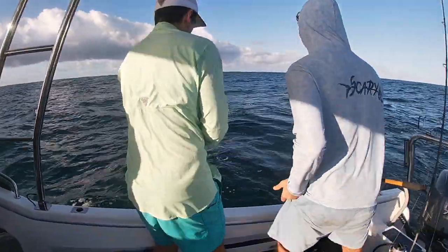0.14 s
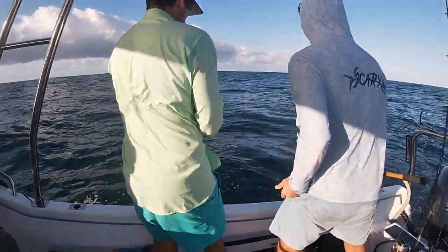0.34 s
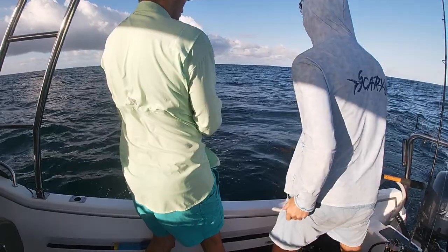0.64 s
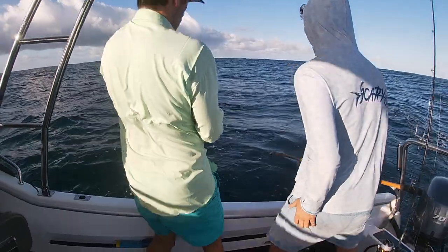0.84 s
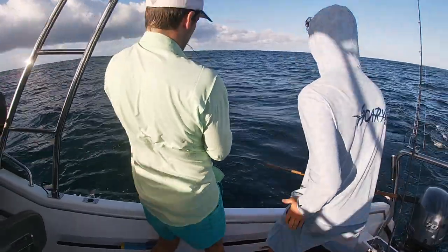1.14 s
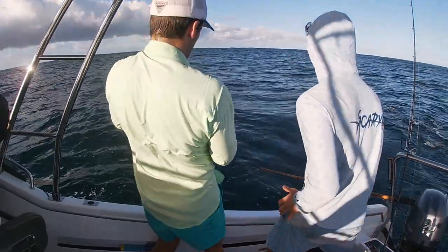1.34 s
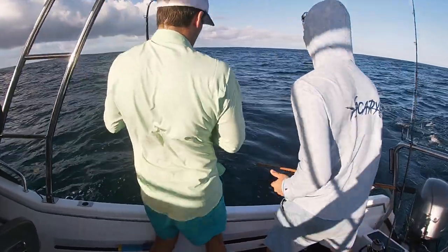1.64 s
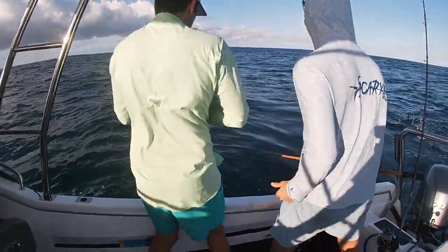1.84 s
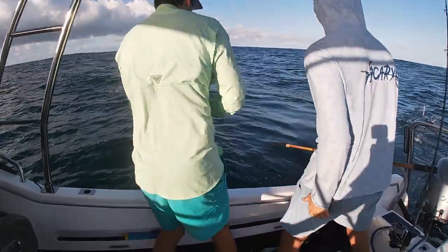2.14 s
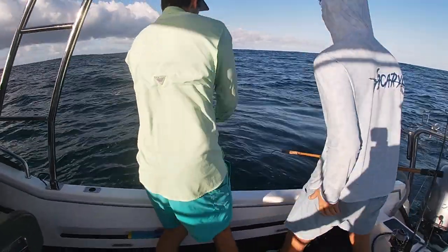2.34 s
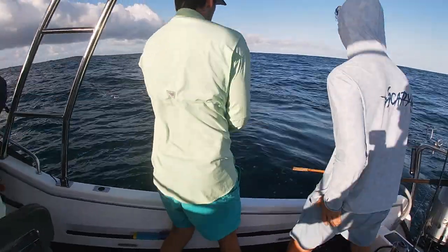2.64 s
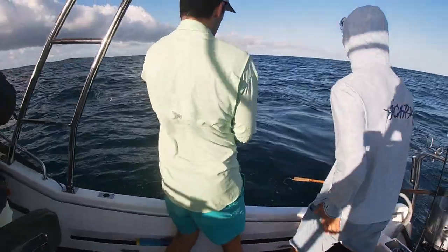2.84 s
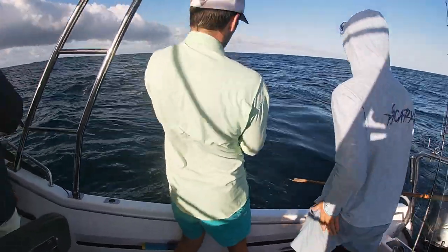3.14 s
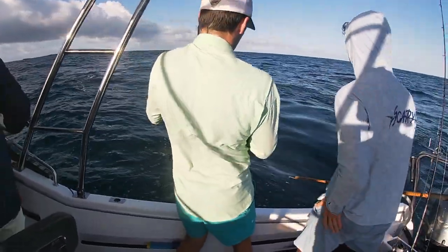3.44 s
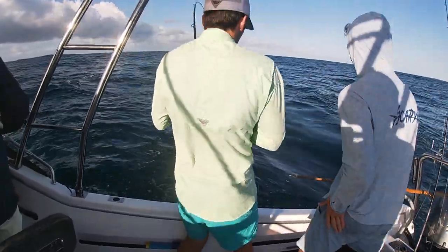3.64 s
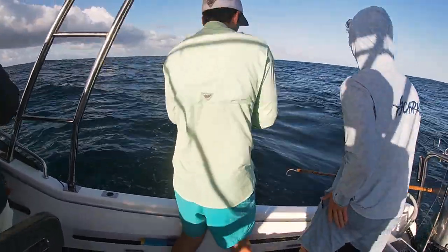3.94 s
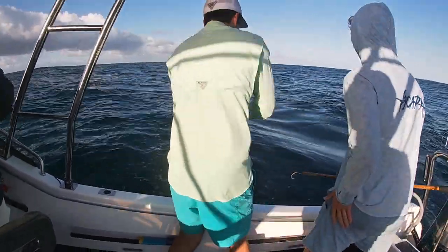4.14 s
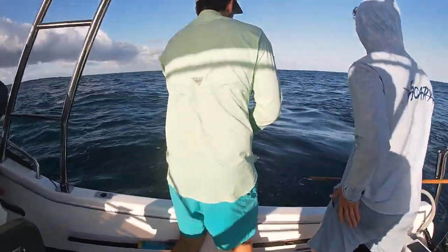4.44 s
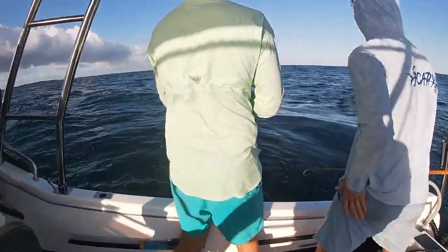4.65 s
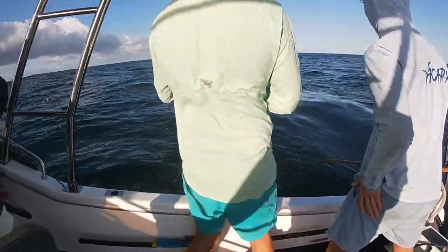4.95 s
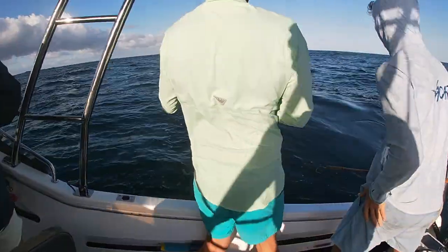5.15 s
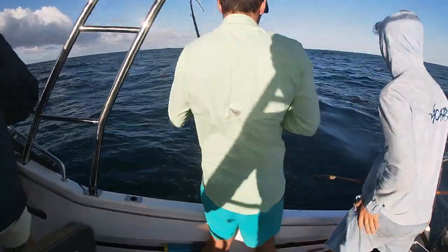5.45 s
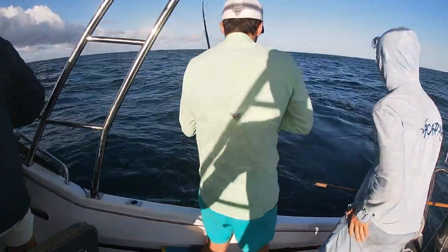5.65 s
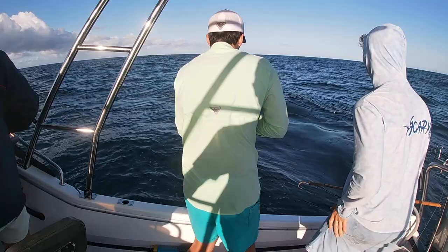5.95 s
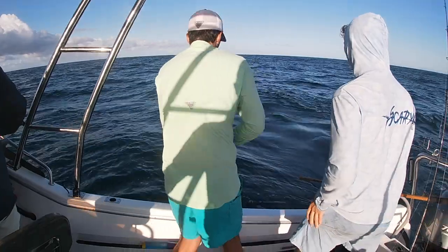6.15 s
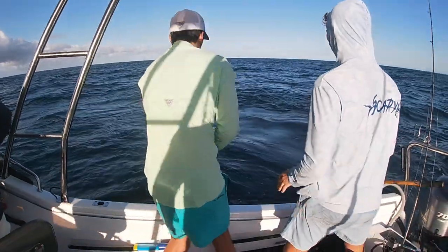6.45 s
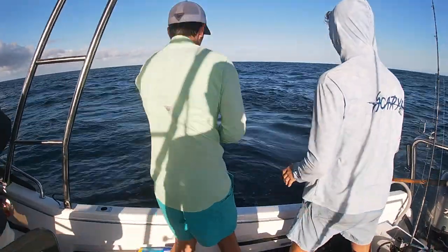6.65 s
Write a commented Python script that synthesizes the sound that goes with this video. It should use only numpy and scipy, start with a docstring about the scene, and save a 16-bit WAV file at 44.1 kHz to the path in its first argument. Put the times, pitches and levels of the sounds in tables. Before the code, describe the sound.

A microphone exposed to wind aboard a trolling boat catches deep irregular buffets and soft flutter. Behind them an idling outboard putters steadily with light valve clatter, growing throatier as the stern sinks. Foam hisses and water slaps the hull. Dry bright knocks sound on deck early on, then waves swell, the exhaust churns bubbly water, and the close brings more gusts and quick gurgling plops.

```python
"""Gusts of wind thump and flutter at a microphone on a small fishing boat trolling at sea.
The outboard idles with a slow chug: tones, puffs of exhaust noise and valve clatter all follow its firings,
and the exhaust grows louder as the stern dips in the swell.
Filtered noise and short damped rings make water wash, spray, slap and gurgle along the hull.
Gear clacks on deck three times, as short bursts of bright noise."""
import sys
import numpy as np
from scipy import signal
from scipy.fft import rfft, irfft
from scipy.io import wavfile
from scipy.ndimage import uniform_filter1d

SR = 44100
rng = np.random.default_rng(int(sys.argv[2]) if len(sys.argv) > 2 else 0)


def pcm_store(signal):
    """Save signal as 16-bit PCM."""
    levels = np.round(np.clip(np.atleast_2d(signal), -1, 1) * 32767)
    wavfile.write(sys.argv[1], SR, levels.astype(np.int16).T)


N = 299870
TIME = np.arange(N) / SR

# idle speed of the engine before its small random hunting: time_s, firings_per_s
IDLE_SPEED = [(0, 25.1), (1.2, 25.0), (2.2, 24.8), (2.8, 24.55), (3.4, 24.88), (4.2, 24.97), (6.0, 25.0),
              (6.8, 24.85)]


def gain_of(db):
    """Turns decibels into amplitude."""
    return 10 ** (np.asarray(db) / 20)


def evened(x):
    """Scales a sound to an rms of 1."""
    return x / np.sqrt(np.mean(x ** 2) + 1e-20)


def curve(rows):
    """Joins the (time, value) rows of a table by straight lines."""
    time_s, values = np.transpose(rows)
    return np.interp(TIME, time_s, values)


def coloured(x, colour):
    """Filters by a curve drawn over log frequency, nearly silent above its last point; rms 1."""
    hz, db = np.transpose(colour)
    bins = np.fft.rfftfreq(len(x), 1 / SR)
    curve_db = np.interp(np.log(bins + 1), np.log(hz), db, right=-120)
    return evened(irfft(rfft(x) * gain_of(curve_db), len(x)))


def resonant(x, hz, width_hz):
    """Rings at one pitch: three equal resonances in a row give steep skirts; rms 1."""
    bins = np.fft.rfftfreq(len(x), 1 / SR)
    response = 1 / (1 + 1j * (bins - hz) / width_hz) ** 3
    return evened(irfft(rfft(x) * response, len(x)))


def wander(per_s):
    """Smooth random movement of rms 1, mostly slower than per_s times a second."""
    bins = np.fft.rfftfreq(N, 1 / SR)
    smooth = rfft(rng.standard_normal(N)) / (1 + (bins / per_s) ** 4)
    return evened(irfft(smooth, N))


def add(mix, start_s, sound):
    """Mixes a sound in at a given time."""
    part = mix[max(round(start_s * SR), 0):][:len(sound)]
    part += sound[:len(part)]


def burst(rise_s, decay_s):
    """A half-second envelope that rises quickly to 1 and dies away."""
    t = TIME[:SR // 2]
    shape = (1 - np.exp(-t / rise_s)) * np.exp(-t / decay_s)
    return shape / shape.max()


def swell(start, length, attack_s, release_s):
    """An envelope that rises smoothly to 1, holds until its length is up, and dies away."""
    age = TIME - start
    rise = np.sin(np.pi / 2 * np.clip(age / attack_s, 0, 1)) ** 2
    return rise * np.exp(-np.maximum(age - length, 0) / release_s)


def swells(rows, attack_s, release_s):
    """Sums the envelopes of rows that give start_s, length_s, level_db."""
    return sum(gain_of(db) * swell(start, length, attack_s, release_s) for start, length, db in rows)


def bubbles(per_s, low_hz, high_hz, cycles, spread_db, count=36):
    """Many short damped rings of random pitch and size."""
    happens = rng.random(N) < per_s / SR
    size = gain_of(spread_db * np.minimum(rng.exponential(1, N), 4)) * happens
    kind, t, out = rng.integers(0, count, N), TIME[:2048], np.zeros(N)
    for k, hz in enumerate(np.geomspace(low_hz, high_hz, count)):
        ring = np.sin(2 * np.pi * hz * t) * np.exp(-hz * t / cycles)
        out += signal.oaconvolve(size * (kind == k), evened(ring))[:N]
    return evened(out)


def rippled(x, patchy_db, size=1024):
    """Reflections off the moving water lift and sink narrow patches of the spectrum."""
    overlap = size * 3 // 4
    spectrum = signal.stft(x, nperseg=size, noverlap=overlap)[2]
    patches = uniform_filter1d(rng.standard_normal(spectrum.shape), size=3, axis=0)  # across pitch
    patches = evened(uniform_filter1d(patches, size=22, axis=1))  # across time
    return signal.istft(spectrum * gain_of(patchy_db * patches), nperseg=size, noverlap=overlap)[1][:N]


def firings(drift=.001):
    """Counts the engine firings so far, a fraction included; the idle hunts a little."""
    return np.cumsum(curve(IDLE_SPEED) * (1 + drift * wander(5))) / SR


def uneven(turns, spread_db):
    """Gives each firing its own random strength, with the steps between firings smoothed."""
    firing = (turns + 2).astype(int)
    strength = rng.standard_normal(firing[-1] + 1)[firing]
    return gain_of(spread_db * uniform_filter1d(strength, size=100))


def chug(turns, delay, second, decay, between):
    """Each firing gives a puff, and a weaker one follows half a cycle later; times are in cycles."""
    first_turns, second_turns = turns - delay, turns - delay - .5
    first_age, second_age = first_turns % 1 / decay, second_turns % 1 / decay
    first_puff = first_age * np.exp(1 - first_age) * uneven(first_turns, spread_db=2)
    second_puff = second * second_age * np.exp(1 - second_age) * uneven(second_turns, spread_db=3.5)
    return evened(between + first_puff + second_puff)


def engine_noise(turns, alike, count=16):
    """Noise of which a share comes back alike on every firing, slowly renewed as the water shifts."""
    cycles = rng.standard_normal((count + 1, round(SR / IDLE_SPEED[0][1])))
    which, blend = np.divmod(np.arange(N) * count, N)
    place = (turns % 1 * cycles.shape[1]).astype(int)
    angle = np.pi / 2 * blend / N  # crossfades from one stored cycle to the next
    repeated = np.cos(angle) * cycles[which, place] + np.sin(angle) * cycles[which + 1, place]
    alike = np.clip(alike, 0, 1)
    return np.sqrt(alike) * repeated + np.sqrt(1 - alike) * rng.standard_normal(N)


def outboard_and_high_rings(turns, drone_db=-1, splutter_db=-4, clatter_db=-6, high_ring_db=-15, waver=0.43):
    """Firing tones throb and drone; pulsed noise makes exhaust, clatter and splashy rings near 3 kHz."""
    # tones of the drone: multiple_of_firing_rate, relative_level_db
    drone_tones = [(2, -4.5), (3, -14.5), (4, -10.5), (5, -3), (6, -5.5), (7, -2), (8, -0.5), (9, -9.5),
                   (10, -10), (11, -13)]
    # drone through the hull, before drone_db: time_s, level_db
    hum_levels = [(0, -40.5), (0.5, -38.5), (1.2, -29.5), (1.8, -31.5), (2.45, -37), (3.5, -39),
                  (3.9, -34.5), (4.2, -24), (4.6, -29.5), (5.3, -23.5), (5.9, -32), (6.8, -27)]
    # swells of the throb: start_s, length_s, level_db
    throb_swells = [(4.0, 0.99, -34), (5.33, 0.22, -20)]
    # exhaust, louder as the stern dips, before splutter_db: time_s, level_db
    exhaust_levels = [(0, -68), (.42, -47), (.66, -36), (1.45, -38), (2.16, -35), (2.3, -44.5),
                      (2.55, -41.5), (2.8, -35.5), (3.15, -39), (3.4, -30.5), (4.2, -28.5), (5.08, -26.5),
                      (5.55, -34.5), (6.5, -31.5), (6.8, -32.5)]
    # tone of the exhaust: pitch_hz, relative_level_db
    splutter_colour = [(120, -12.5), (250, -1.5), (370, -4), (440, 0), (590, 1.5), (740, -5.5),
                       (1000, -10.5), (1600, -14.5), (3000, -41.5), (7000, -43.5)]
    # valve clatter, before clatter_db or high_ring_db: time_s, level_db
    valve_levels = [(0.0, -37.5), (1.04, -35), (2.1, -37), (2.6, -47.5), (3.48, -40), (5.0, -37),
                    (5.7, -41), (6.2, -44.5), (6.79, -41.5)]
    # tone of the valve clatter: pitch_hz, relative_level_db
    clatter_colour = [(500, -36), (1100, 2), (1850, 4), (2300, 4.5), (2750, -1), (3450, -14), (4700, -9),
                      (5600, -11), (7100, -39.5), (10000, -40), (15000, -66.5)]
    # short splashy rings near 3 kHz: start_s, length_s, level_db
    high_ring_flares = [(.83, 0.041, -41), (1.23, 0.11, -43), (2.55, 0.03, -45), (2.845, 0.09, -44),
                        (3.8, 0.14, -44.5), (5.95, 0.85, -47.5)]

    hum_db, valves_db = curve(hum_levels), curve(valve_levels)
    # the throb gains 0.31 dB for each dB of drone
    throb_gain = gain_of(-22 + 0.31 * hum_db) + swells(throb_swells, attack_s=0.11, release_s=0.018)
    throb = throb_gain * evened(np.cos(2 * np.pi * (turns - .8)))
    tones = np.zeros(N)
    for multiple, db in drone_tones:
        strength = gain_of(db) * (1 + waver * wander(12.5))
        phase = 2 * np.pi * (multiple * turns + rng.random()) + 2 * waver * wander(8.7)
        tones += strength * np.cos(phase)
    drone = gain_of(hum_db + drone_db) * evened(tones)

    puffs = engine_noise(turns, alike=0.61) * chug(turns, delay=0.258, second=0.27, decay=0.042, between=1.0)
    exhaust = gain_of(curve(exhaust_levels) + splutter_db) * coloured(puffs, splutter_colour)
    ticks = engine_noise(turns, alike=0.38) * chug(turns, delay=0.83, second=0.088, decay=0.033, between=0.97)
    clatter = gain_of(valves_db + clatter_db) * coloured(ticks, clatter_colour)
    # a faint ring follows the clatter level between the flares
    ring_gain = gain_of(valves_db + high_ring_db) + swells(high_ring_flares, attack_s=0.015, release_s=0.021)
    high_ring = ring_gain * gain_of(2 * wander(20)) * resonant(ticks, hz=3030, width_hz=520)
    return throb + drone + rippled(exhaust + clatter + high_ring, patchy_db=3.5)


def hollows(turns):
    """Each puff of exhaust rings the air trapped under the stern for as long as a hollow lasts."""
    # hollows of air under the stern: start_s, end_s, level_db, pitch_hz, width_hz
    air_hollows = [(0.98, 1.45, -39, 917, 42), (2.66, 4, -45, 1040, 140), (3.55, 4.26, -39.5, 400, 29),
                   (4.12, 5.213, -36.5, 494, 19.5), (3.998, 5.16, -40, 597, 41)]
    out = np.zeros(N)
    for start, end, db, hz, width_hz in air_hollows:
        puffs = rng.standard_normal(N) * chug(turns, delay=0.88, second=0.1, decay=0.084, between=0.1)
        ring = resonant(puffs, hz, width_hz)[round(start * SR):round(end * SR)]
        add(out, start, gain_of(db) * evened(ring) * signal.windows.tukey(len(ring), .5))
    return out


def sea_levels(calm_wash_db=-48.5, calm_spray_db=-54, spray_lag_s=0.02):
    """Each wave builds and drains away over the calm sea; its spray comes a little later."""
    # waves running along the hull: start_s, rise_s, decay_s, wash_level_db, spray_level_db
    waves = [(.2, 0.12, 1, -49, -51.5), (.55, 0.31, 0.11, -35.5, -53), (.8, 0.35, 0.36, -36, -51),
             (1.48, 0.094, 1, -39.5, -49), (2.8, 0.4, 0.43, -39, -77), (3.2, 0.22, 0.22, -31.5, -49),
             (3.4, 0.23, 0.094, -34.5, -47), (3.8, 0.22, 0.17, -32.5, -47), (4.27, 0.18, 0.15, -32, -46),
             (5.0, .2, 0.11, -41, -44.5), (5.9, 0.2, 0.53, -44.5, -50.5)]
    wash_power, spray_power = gain_of(calm_wash_db) ** 2, gain_of(calm_spray_db) ** 2
    for start, rise_s, decay_s, wash_db, spray_db in waves:
        wash_wave = gain_of(wash_db) * swell(start, rise_s, rise_s, decay_s)
        spray_wave = gain_of(spray_db) * swell(start + spray_lag_s, rise_s, rise_s, decay_s)
        wash_power = wash_power + wash_wave ** 2
        spray_power = spray_power + spray_wave ** 2
    return np.sqrt(wash_power), np.sqrt(spray_power)


def sea(turns, fizzy=0.94):
    """Foam and bubbles swell with each wave; the exhaust churns them in time with the engine."""
    # wash running on between firings, small where the water chuffs clearly: time_s, amount (before evening)
    lull = [(0, .6), (3.2, .55), (3.42, .9), (3.6, .7), (3.72, .1), (4.0, .12), (5.0, .22), (5.6, .7)]
    # tone of the foam and gurgle: pitch_hz, relative_level_db
    wash_colour = [(200, -57.5), (500, -9.5), (900, -3), (1250, -4), (1650, -6), (2200, -11.5),
                   (3000, -8.5), (4000, -24.5), (6000, -29.5), (7500, -64)]
    # tone of the mist and fizz: pitch_hz, relative_level_db
    spray_colour = [(1200, -34), (2500, -32), (3500, 2), (4700, -1.5), (5600, -4), (6300, -12),
                    (7200, -21.5), (10000, -25), (13000, -32.5), (15000, -62)]

    wash, spray = sea_levels()
    churn = chug(turns, delay=.87, second=.22, decay=.17, between=curve(lull))
    foam = coloured(engine_noise(turns, alike=0.34) * churn, wash_colour)
    low_bubbles = bubbles(per_s=1500, low_hz=500, high_hz=3400, cycles=8, spread_db=2.2)
    gurgle = .7 * coloured(churn * low_bubbles, wash_colour)
    mist = coloured((churn + .8) * rng.standard_normal(N), spray_colour)
    high_bubbles = bubbles(per_s=1500, low_hz=2500, high_hz=13000, cycles=9, spread_db=2.7)
    fizz = coloured(high_bubbles, spray_colour)
    droplets = evened(mist + fizzy * fizz) * gain_of(1.2 * wander(20))
    return rippled(wash * evened(foam + gurgle) + spray * droplets, patchy_db=3.0)


def spatter(turns):
    """While the stern sits deep, each firing flings a spray of drops that crackle as they land."""
    # tone of the drops: pitch_hz, relative_level_db
    spatter_colour = [(600, -10), (2600, 0), (5600, -10), (7200, -25), (14000, -28)]
    flung = chug(turns, delay=.89, second=.2, decay=.17, between=.2)
    crackle = bubbles(per_s=7000, low_hz=900, high_hz=7000, cycles=1.5, spread_db=2.2)
    drops = coloured(crackle, spatter_colour)
    deep = swell(start=3.62, length=1.36, attack_s=.15, release_s=.08)
    return gain_of(-40) * deep * flung * drops


def slaps_and_thump(ragged_db=0.5):
    """Ragged bursts around one resonance: water slaps, and at 2.687 s a hard thump at the microphone."""
    # bursts, with the peak of a smooth envelope of equal energy:
    # start_s, peak_db, rise_s, decay_s, centre_hz, width_hz
    ragged_bursts = [(0.724, -39.5, 0.002, 0.035, 4970, 1500), (0.836, -35, 0.006, 0.025, 3900, 2400),
                     (0.928, -33.5, 0.0019, 0.02, 746, 137), (1.153, -28.5, 0.004, 0.0086, 1980, 1000),
                     (1.235, -29, 0.0032, 0.015, 2020, 1100), (1.272, -28.5, 0.0055, 0.025, 634, 158),
                     (1.437, -29, 0.00091, 0.032, 1400, 400), (1.666, -31.5, 0.0014, 0.031, 1410, 450),
                     (1.952, -23.5, 0.0091, 0.037, 700, 1700), (1.997, -18.5, 0.0069, 0.03, 1300, 2940),
                     (2.002, -24, 0.0066, 0.024, 640, 293), (2.057, -25, 0.0072, 0.053, 850, 1400),
                     (2.184, -24.5, 0.002, 0.018, 470, 300), (2.687, -15.5, 0.00055, 0.021, 480, 600),
                     (3.442, -39.5, 0.0073, 0.014, 5330, 1800), (3.833, -40, 0.004, 0.011, 4000, 600),
                     (3.934, -24.5, 0.0027, 0.018, 895, 1200), (4.059, -24, 0.0033, 0.02, 1510, 1490),
                     (4.137, -22, 0.0078, 0.048, 1020, 900), (4.138, -18, 0.0052, 0.011, 360, 251),
                     (4.986, -24, 0.002, 0.013, 2700, 2700), (4.989, -18.5, 0.0031, 0.018, 600, 298),
                     (5.963, -32, 0.003, 0.012, 1600, 1500), (6.085, -34, 0.0048, 0.016, 1100, 1100),
                     (6.359, -17.5, 0.0061, 0.015, 303, 130), (6.67, -21.5, 0.0036, 0.023, 292, 179)]
    out, size = np.zeros(N), SR // 2
    ragged = gain_of(ragged_db * wander(130))
    burst_colour = [(100, 14.0), (5800, -15.0), (7200, -24), (13000, -37)]  # pitch_hz, relative_level_db
    for start, db, rise_s, decay_s, hz, width_hz in ragged_bursts:
        shape = burst(rise_s, decay_s)
        noise = coloured(rng.standard_normal(size), burst_colour)
        hit = shape * resonant(noise, hz, width_hz)
        hit = hit * np.roll(ragged, -round(start * SR))[:size]
        add(out, start, gain_of(db) * hit * np.linalg.norm(shape) / np.linalg.norm(hit))
    return out


def gulps(ring_s=0.0018, glide=1.3, high=0.35, low=0.4, rough=.1, splashy=.33):
    """Each gulp starts faint and high, slides shakily down, and ends in a low plop inside a small splash."""
    # air pockets gulping along the hull: loudest_at_s, level_db (of the plop's envelope),
    # pitch_hz (when loudest, before the shake), swell_s
    air_gulps = [(6.378, -30, 1560, 0.003), (6.391, -28.5, 1620, 0.003), (6.431, -31, 1850, 0.004),
                 (6.456, -30.5, 1650, 0.002), (6.502, -29, 1540, 0.006), (6.546, -29, 1410, 0.002),
                 (6.623, -26.5, 1490, 0.002), (6.679, -27, 1510, 0.003), (6.713, -29.5, 1530, 0.003),
                 (6.779, -28.5, 1490, 0.005)]
    out, t = np.zeros(N), TIME[:4096] - TIME[2048]  # time 0 is the loudest moment
    shake = wander(500)
    for peak_s, db, hz, swell_s in air_gulps:
        slide = np.maximum(1 + high * (1 - np.exp(t / (glide * swell_s))), low)
        pitch = hz * slide * (1 + rough * np.roll(shake, -round(peak_s * SR))[:len(t)])
        shape = np.exp(np.minimum(t / swell_s, -t / ring_s))
        plop = shape * evened(np.sin(2 * np.pi * np.cumsum(pitch) / SR))
        splash = np.sqrt(shape) * resonant(rng.standard_normal(len(t)), hz, hz / 2)
        add(out, peak_s + t[0], gain_of(db) * (plop + splashy * splash))
    return out


def gear(rise_s=0.00051, decay_s=0.014):
    """Gear knocks on deck: dry, bright bursts of noise with no clear ring."""
    # knocks: start_s, level_db (peak of the envelope)
    clacks = [(2.179, -20.5), (2.214, -25), (2.352, -27)]
    # tone of the knocks: pitch_hz, relative_level_db
    clack_colour = [(300, 14.5), (1000, -4), (2000, 3), (3200, -1), (5500, -4), (7200, -21), (10000, -29),
                    (14000, -49)]
    out = np.zeros(N)
    for start, db in clacks:
        knock = coloured(rng.standard_normal(SR // 2), clack_colour) * burst(rise_s, decay_s)
        add(out, start, gain_of(db) * knock)
    return out


def eddies(colour, lumpy_db, span_s=0.054):
    """Lumpy turbulence whose strength holds steady from one span to the next."""
    air = coloured(rng.standard_normal(N) * gain_of(lumpy_db * wander(60)), colour)
    nearby_power = uniform_filter1d(air ** 2, max(round(span_s * SR), 2))
    return air / np.sqrt(nearby_power + 0.059)


def wind_levels(breeze_rumble_db=-37, breeze_flutter_db=-50.5, breeze_wander_db=5):
    """Gusts of rumble and flutter rise, hold and let go over a restless breeze."""
    # gusts at the microphone: start_s, length_s, rumble_level_db, flutter_level_db
    gusts = [(0.044, 0.28, -32, -44), (0.73, 0.28, -34, -44), (1.05, 0.097, -23.5, -35.5),
             (1.518, 0.12, -27, -39), (1.964, 0.18, -18, -29), (2.155, 0.071, -23.5, -30.5),
             (2.643, 0.14, -21, -38), (2.853, 0.095, -26.5, -35), (3.972, 0.24, -31, -29.5),
             (4.445, 0.13, -33, -27), (4.897, 0.25, -53, -29), (5.178, 0.2, -22, -25),
             (5.488, 0.38, -32, -34), (6.012, 0.11, -34, -33.5), (6.276, 0.14, -33, -26),
             (6.435, 0.13, -28.5, -33), (6.589, 0.1, -30, -25.5)]
    breeze = gain_of([[breeze_rumble_db], [breeze_flutter_db]]) * gain_of(breeze_wander_db * wander(2.1))
    power = breeze ** 2
    for start, length, rumble_db, flutter_db in gusts:
        shape = swell(start, length, attack_s=0.03, release_s=0.05)
        power = power + (gain_of([[rumble_db], [flutter_db]]) * shape) ** 2
    return np.sqrt(power)


def wind(ragged=0.21, cycles=1.0):
    """Large eddies rumble, small ones flutter, and single eddies swing the pressure for a cycle or two."""
    # tone of the large eddies: pitch_hz, relative_level_db
    rumble_colour = [(10, -18), (25, 6), (45, -4.5), (62, 4.5), (85, -3), (130, -5.5), (200, -12),
                     (400, -56), (1000, -74)]
    # tone of the small eddies: pitch_hz, relative_level_db
    flutter_colour = [(50, -30), (110, -4), (160, 4.5), (240, -1), (330, -3.5), (450, -9.5), (700, -21),
                      (1500, -25.5), (4000, -32.5)]
    # single eddies that thump the microphone: start_s, level_db (peak of the envelope), pitch_hz
    buffets = [(0.062, -17, 89), (0.103, -21, 115), (0.155, -28.5, 70.4), (0.223, -14.5, 83),
               (0.321, -17, 58), (0.503, -16, 116), (1.125, -15, 147), (1.569, -21.5, 76),
               (1.967, -15, 135), (2.007, -12, 148), (2.033, -11, 168), (2.066, -9.5, 68.5),
               (2.099, -5, 61.4), (2.134, -22, 58.5), (2.174, -15.5, 56), (2.248, -12, 29.8),
               (2.275, -14.5, 173), (2.589, -15, 34.3), (2.686, -18, 225), (2.709, -12, 157),
               (2.735, -14, 114), (2.775, -18, 63), (2.895, -16.5, 148), (4.035, -15, 128),
               (4.102, -14, 62), (4.12, -9.5, 144), (4.548, -14.5, 135), (5.217, -15, 92),
               (5.249, -16, 155), (5.347, -15, 257), (5.413, -11, 154), (6.324, -15, 152),
               (6.344, -14, 181), (6.413, -15.5, 62), (6.497, -17, 62.4), (6.688, -18, 141)]
    rumble, flutter = wind_levels()
    out = rumble * eddies(rumble_colour, lumpy_db=3.5) + flutter * eddies(flutter_colour, lumpy_db=2.5)
    for start, db, hz in buffets:
        shape = burst(0.22 / hz, cycles / hz)
        swirl_colour = [(hz / 2, 0), (2 * hz, -3), (4 * hz, -20), (12 * hz, -60)]
        swirl = coloured(rng.standard_normal(len(shape)), swirl_colour)
        swing = -np.sin(2 * np.pi * hz * TIME[:len(shape)])
        add(out, start, gain_of(db) * shape * (ragged * swirl + swing))
    return out


def scene():
    """Engine, water, gear, wind and short high rings add up at one microphone."""
    turns = firings()
    engine = outboard_and_high_rings(turns) + hollows(turns)
    water = sea(turns) + spatter(turns) + gulps()
    return (engine + water + slaps_and_thump() + gear() + wind())[None]


def record(dry, ceiling=0.68, edge_hz=14900):
    """Softly rounds the strongest peaks, then removes what lies above the band edge."""
    rounded = ceiling * np.tanh(dry / ceiling)
    low_pass = signal.firwin(511, edge_hz, window=("kaiser", 9), fs=SR)
    return signal.oaconvolve(rounded, low_pass[None], "same")


dry = scene()
out = record(dry)
pcm_store(out)
```